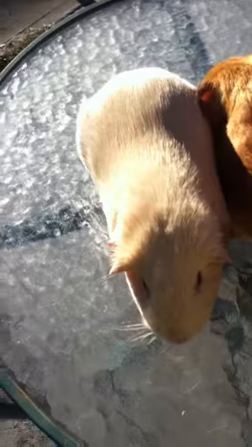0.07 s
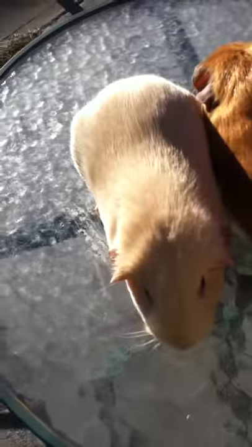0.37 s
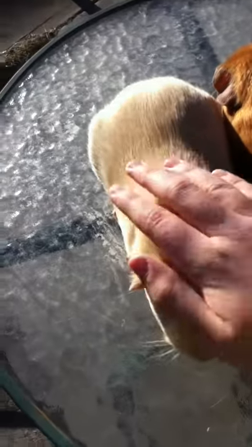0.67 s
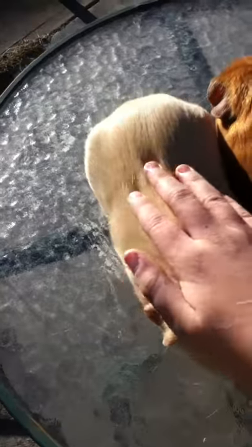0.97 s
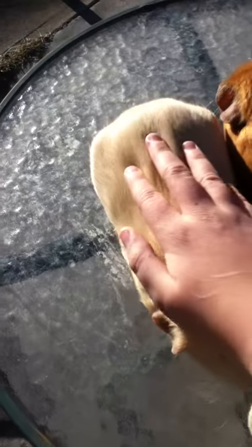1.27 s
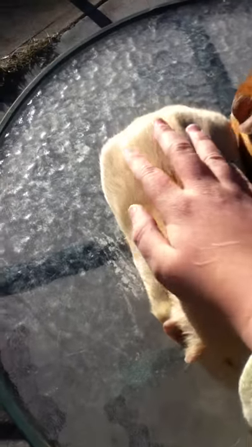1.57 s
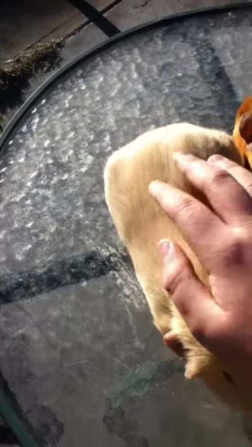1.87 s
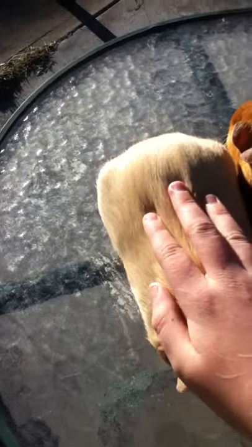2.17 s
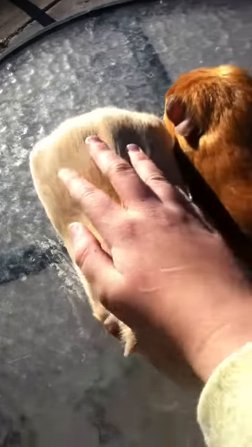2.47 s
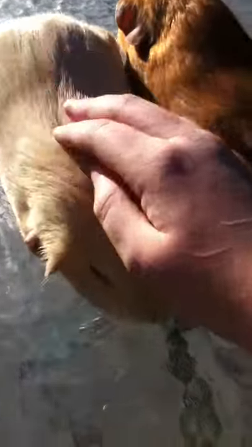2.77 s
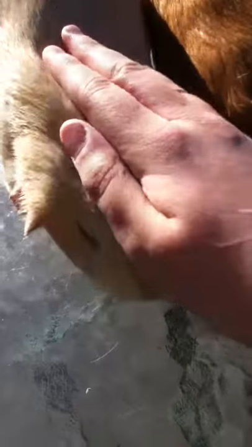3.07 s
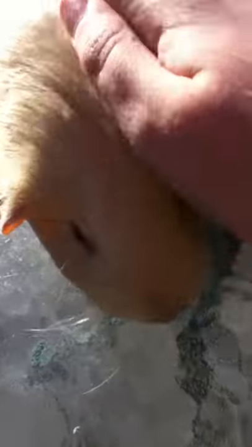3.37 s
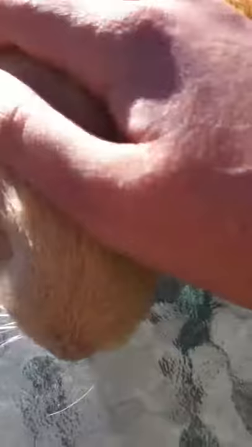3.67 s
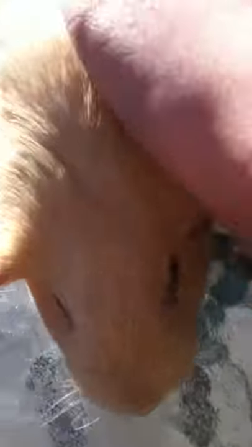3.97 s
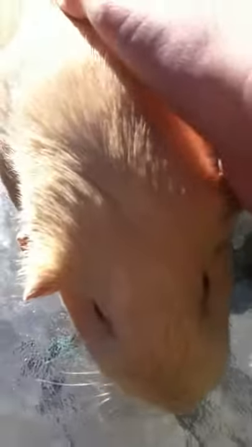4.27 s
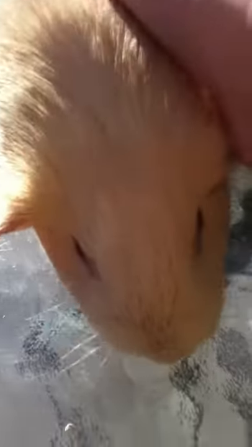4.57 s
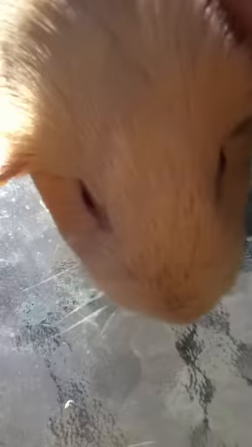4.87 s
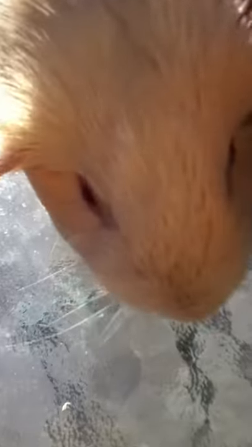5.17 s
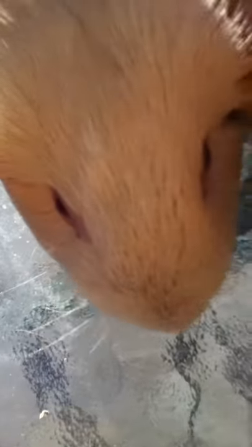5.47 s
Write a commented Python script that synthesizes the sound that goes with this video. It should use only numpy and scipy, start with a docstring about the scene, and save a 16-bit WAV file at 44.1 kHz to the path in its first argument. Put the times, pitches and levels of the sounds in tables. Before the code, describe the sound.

A faint outdoor hiss and distant low rumble run throughout. In the first half second come a few dry ticks, a light fur rustle and a brief falling squeak like a finger on glass. Sparrows chirp further off, slightly echoing, on and off until about 4.7 seconds. A guinea pig, close and almost dry, gives a tiny squeak at 1.1 seconds, then short wavering whimpers and rising squeaks from 1.5 to 3.2 seconds. From 3.3 to 3.9 seconds its calls turn brighter and a little raspy. Soft bumps fall at 3.5 and 4 seconds, the second with a brief, thin, very high whistle, over very faint fur rustle. Sharply rising squeaks and thin whines follow from 4.1 seconds, with the loudest squeaks at about 4.9 and 5.3 seconds. A low hum swells slightly late on, and a soft bump with a tick comes at 5.5 seconds.

```python
"""Guinea pig on a glass garden table

A brief falling squeak like a finger on glass, then the stroked animal's short, nearly pure, mostly
rising calls: vocal-fold harmonics shaped by the throat, louder and brighter as it gets excited and
the microphone nears. Sparrows chirp further off among house walls. Fur rustles; a few ticks, soft
bumps and a brief high whistle sound over a distant outdoor hum."""
import sys
import numpy as np
from scipy import signal
from scipy.fft import rfft, irfft
from scipy.io import wavfile
from scipy.ndimage import uniform_filter1d

SR = 44100
rng = np.random.default_rng(int(sys.argv[2]) if len(sys.argv) > 2 else 0)


def generate_wav(signal):
    """Clip the signal to [-1, 1] and save it as 16-bit WAV at the path in sys.argv[1]."""
    frames = np.transpose(np.atleast_2d(signal))
    scaled = np.clip(frames, -1, 1) * 32767
    pcm = np.round(scaled).astype(np.int16)
    wavfile.write(sys.argv[1], SR, pcm)


N = 248283
TIME = np.arange(N) / SR
TOP_HZ = 17250


def undb(db):
    """Decibels to gain."""
    return 10 ** (np.asarray(db) / 20)


def unit(x):
    """Scale to rms 1."""
    return x / np.sqrt(np.mean(x ** 2))


def curve(rows, t):
    """Linear interpolation of (time, value) rows."""
    return np.interp(t, *np.transpose(rows))


def spectrum_db(points, hz):
    """Interpolation of (frequency, level) rows over log frequency."""
    f, db = np.transpose(points)
    return np.interp(np.log(np.maximum(hz, 1)), np.log(f), db)


def walk(rate_hz, size):
    """Smooth random wander, spread near 1."""
    k = max(int(SR / rate_hz), 1)
    held = np.repeat(rng.standard_normal(size // k + 1), k)
    return np.sqrt(2) * uniform_filter1d(uniform_filter1d(held, k), k)[:size]


def swells(rows):
    """Sum of smooth rises and falls, one per (start, length, level) row."""
    return sum(undb(db) * np.sin(np.pi * np.clip((TIME - start_s) / length_s, 0, 1)) ** 2
               for start_s, length_s, db in rows)


def resonate(x, hz, width_hz):
    """One resonance, gain 1 at centre."""
    return signal.lfilter(*signal.iirpeak(hz, hz / width_hz, fs=SR), x)


def add(out, start_s, x):
    """Mix x into out at start_s."""
    i = int(start_s * SR)
    out[i:i + len(x)] += x[:max(N - i, 0)]


def echoes(x, t60_s, count, delay_s=.012):
    """Scattered, decaying reflections; unit-energy response."""
    when, polarity = rng.random((count, 2)).T
    taps = ((delay_s + when * t60_s) * SR).astype(int)
    response = np.zeros(SR * 2)
    np.add.at(response, taps, np.sign(polarity - .5) * undb(-60 * when))
    return signal.fftconvolve(x, response / np.linalg.norm(response))[:N]


# Outdoor noise spectrum: f/Hz, relative level/dB
AIR_SPECTRUM = [(15, -55), (25, -17), (103, -1.5), (140, -2), (210, -5.5), (416, -9.5), (490, -10),
                (717, -7), (1050, -7.5), (1420, -16.5), (1540, -16.5), (1920, -21.5), (3310, -24.5),
                (8360, -26.5), (17000, -31)]
# Rumble swell: t/s, gain/dB
RUMBLE_SWELL = [(0, -3), (1, -1.5), (2.2, -1), (3, 1.5), (3.7, 1), (4.3, 1), (5, 1.5), (5.6, 1)]


def outdoor_air(level_db=-49, flicker_db=1.62, split_hz=1800):
    """Smooth hiss over a far rumble that flickers by octave; the low octaves swell most."""
    hz = np.arange(N // 2 + 1) * SR / N
    shaped = rfft(rng.standard_normal(N)) * undb(spectrum_db(AIR_SPECTRUM, hz))
    air = rfft(unit(irfft(shaped, N))) * undb(level_db)
    swell_db = curve(RUMBLE_SWELL, TIME)
    out = irfft(air * (hz >= split_hz), N)
    for octave in range(7):
        edge_hz = split_hz / 2 ** octave
        band = irfft(air * (hz < edge_hz) * (hz >= edge_hz / 2), N)
        depth = min((octave + 1) / 4, 1)
        out += band * undb(depth * swell_db + flicker_db * walk(12, N))
    return out


# Hum envelope: t/s, level/dB
HUM_LEVEL = [(0, -65), (3, -62.5), (4.5, -55.5), (5.1, -60), (5.6, -51)]


def distant_hum(hz=149.1, waver_hz=1.43, waver_db=2):
    """A low tone, wavering in pitch and level."""
    phase = 2 * np.pi * np.cumsum(hz + waver_hz * walk(17, N)) / SR
    return np.sin(phase) * undb(curve(HUM_LEVEL, TIME) + waver_db * walk(3.5, N))


# Whistle pulses: t/s, length/s, level/dB
WHISTLE_PULSES = [(3.933, 0.057, -52), (3.992, .04, -63)]


def whistle(hz=12064):
    """A thin, very high tone in two brief pulses."""
    return swells(WHISTLE_PULSES) * np.sin(2 * np.pi * hz * TIME)


# Hand strokes: t/s, length/s, level/dB
STROKES = [(.12, .27, -58), (0.355, 0.63, -71), (3.3, 1.27, -64.5)]


def fur(centre_hz=10500, width_hz=8000, spread_db=6):
    """Hairs slip under the fingers: fine, uneven crackle swelling with each stroke."""
    hairs = rng.standard_normal(N) * undb(spread_db * walk(900, N))
    return unit(resonate(hairs, centre_hz, width_hz)) * swells(STROKES)


# Dry ticks: t/s, level/dB, centre f/Hz
TICKS = [(0.176, -39, 12000), (.181, -48, 12000), (.230, -47, 13000), (0.247, -45, 10500),
         (.2703, -36.5, 7900), (.398, -53, 12000), (5.5, -49, 1800)]
# Soft bumps: t/s, level/dB, ring f/Hz, t60/s
BUMPS = [(3.5315, -33, 490, .03), (3.950, -39, 520, .03), (5.499, -31, 560, .01)]


def handling(tick_decay_s=.0009, tick_width_hz=8000):
    """The moving hand makes dry ticks and dull, quickly damped bumps."""
    out, t = np.zeros(N), np.arange(SR // 10) / SR
    for start_s, db, hz in TICKS:
        noise = rng.standard_normal(len(t))
        crack = resonate(resonate(noise, hz, tick_width_hz), hz, tick_width_hz)
        add(out, start_s, undb(db) * unit(crack) * np.exp(-t / tick_decay_s))
    for start_s, db, hz, t60_s in BUMPS:
        push = np.minimum(2 * hz * t, 1)  # soft contact builds over half a cycle
        add(out, start_s, undb(db - 60 * t / t60_s) * push * np.sin(2 * np.pi * hz * t))
    return out


# Sparrow notes, mostly high-low pairs: t/s, length/s, top f/Hz, arch depth/oct, level/dB
CHIRPS = [ (0.119, 0.046, 4800, 0.53, -45), (0.166, .05, 3680, .28, -49), (0.653, 0.053, 5400, 0.26, -59),
          (.722, 0.052, 4850, 0.11, -55.5), (1.106, 0.049, 5400, .6, -51), (1.146, 0.0277, 4400, .14, -44),
          (1.19, 0.054, 4080, .42, -46.5), (1.548, .032, 5940, 0.21, -50), (1.637, 0.033, 4730, .03, -49.5),
          (1.930, 0.051, 3700, .3, -49), (1.931, 0.035, 4470, 0.096, -50.5), (2.316, 0.057, 5560, .12, -51),
          (2.432, 0.042, 5070, 0.17, -55), (3.324, .034, 4900, 0.48, -51), (3.383, .036, 4000, .4, -52.5),
          (3.668, .043, 4490, .42, -48.5), (3.747, 0.037, 4110, 0.39, -49.5),
          (4.522, .027, 5650, 0.22, -51), (4.603, 0.042, 4180, .2, -53.5)]


def sparrows(waver=.014, buzz_per_oct=.0494, thin_db_per_oct=4, lean_db_per_oct=4, flicker_db=3):
    """Arched, wavering whistles, smeared and dulled by the house walls."""
    out = np.zeros(N)
    for start_s, length_s, top_hz, depth_oct, db in CHIRPS:
        u = np.linspace(-1, 1, int(length_s * SR))
        drop_oct = depth_oct * u ** 2
        hz = top_hz * 2 ** -drop_oct * (1 + (waver + buzz_per_oct * depth_oct) * walk(1000, len(u)))
        # thin at the top, loudest on the way down
        shape_db = thin_db_per_oct * (drop_oct - depth_oct / 2) + lean_db_per_oct * depth_oct * u
        gain = undb(db + shape_db + flicker_db * walk(200, len(u))) * (1 - u ** 2) ** (1 / 3)
        add(out, start_s, gain * np.sin(2 * np.pi * np.cumsum(hz) / SR))
    dulled = resonate(out, hz=3800, width_hz=3000)
    return out + undb(-2) * echoes(dulled, t60_s=.48, count=400)


def call_envelope(hz, easy_hz=1000, knee=4.3, strain_db_per_oct=21.5, sag_db_per_s=16, release_s=.0057):
    """Above its easy range the voice starts slower and weakens; each call sags as it goes."""
    t = np.arange(len(hz)) / SR
    strain_oct = np.log2(1 + (hz / easy_hz) ** knee) / knee
    attack_s = np.clip(.0025 * (hz[0] / easy_hz) ** 4, .0025, .014)
    gate = np.minimum(t / attack_s, 1) * np.minimum(t[::-1] / release_s, 1)
    return gate * undb(-strain_db_per_oct * (strain_oct - strain_oct.min()) - sag_db_per_s * t)


def breath(phase):
    """Air leaks through the folds once a cycle and rings two resonances."""
    puffs = rng.standard_normal(len(phase)) * (1 + np.cos(phase))
    main = resonate(resonate(puffs, 2900, 1500), 2850, 1500)
    return unit(main + .085 * resonate(puffs, 9800, 3000))


# Throat and mouth response: f/Hz, gain/dB
THROAT = [(600, 12), (1050, -0.5), (1600, -10), (2000, -6.5), (2450, -7), (3000, -2.5), (3350, -4.5),
          (4200, -16.5), (5500, -14.5), (7400, -11), (9200, -13), (16000, -22)]
# Resonance shift, rising as the mouth opens: t/s, frequency ratio
MOUTH = [(1.5, 0.86), (2.6, 0.93), (3.3, 1.005), (3.9, 1), (4.15, 1.086), (4.7, 1.05), (5.35, 0.93)]


def call(start_s, pitch_hz, overtones_db, roughness, jitter=.0095, tremor_rad=.11, flutter_db=2.5,
         shimmer_db=.35, breath_db=-39, bloom_s=.013, onset_dip_db=1, onset_dull_db_per_oct=4):
    """Vocal folds give a harmonic stack whose overtones sweep through the throat resonances."""
    size = len(pitch_hz)
    mouth = curve(MOUTH, start_s)
    hz = pitch_hz * (1 + jitter * walk(700, size))
    phase = 2 * np.pi * np.cumsum(hz) / SR
    onset = np.exp(-np.arange(size) / SR / bloom_s)
    # high notes and onsets are purer
    slope_db_per_oct = 8.5 * (hz / 1000) ** .13 + onset_dull_db_per_oct * onset
    tremor = tremor_rad * walk(900, size)  # folds close early or late, blurring the top overtones
    voice = np.sin(phase)
    for k in range(2, 11):
        throat_db = spectrum_db(THROAT, k * hz / mouth) - spectrum_db(THROAT, hz / mouth)
        db = overtones_db + throat_db - slope_db_per_oct * np.log2(k) + flutter_db * walk(145, size)
        voice += undb(db) * np.sin(k * (phase + tremor)) * (k * hz < TOP_HZ)
    # uneven cycles; the voice clears above its median pitch
    hoarse = roughness * np.minimum(np.median(pitch_hz) / pitch_hz, 1) ** 3.7
    voice *= 1 + hoarse * walk(1100, size)
    voice += (undb(breath_db + overtones_db) + .17 * hoarse) * breath(phase)
    return voice * call_envelope(pitch_hz) * undb(shimmer_db * walk(300, size) - onset_dip_db * onset)


# Whimper pitch curves: t/s, f/Hz
THIN_WHINE = [(1.567, 1380), (1.583, 1310), (1.593, 1350), (1.603, 1280), (1.617, 1370), (1.626, 1270),
              (1.664, 1390), (1.686, 1270), (1.705, 1410)]
SHORT_WHINE = [(1.845, 840), (1.858, 1020), (1.879, 970), (1.892, 1100), (1.899, 1110), (1.912, 980),
               (1.931, 1170)]
CLIMBING_WHINE = [(1.963, 920), (2.017, 1140), (2.034, 1000), (2.047, 980), (2.133, 1220), (2.143, 1360),
                  (2.168, 1310), (2.193, 1570), (2.2, 1450), (2.238, 1500), (2.25, 1620)]
ARCHED_WHINE = [(2.483, 900), (2.492, 1010), (2.51, 940), (2.524, 980), (2.537, 1230), (2.546, 1200),
                (2.576, 1660), (2.6, 1120), (2.611, 1050)]
LOW_WHINE = [(2.717, 800), (2.724, 820), (2.73, 910), (2.739, 910), (2.75, 780), (2.779, 830), (2.79, 720)]
LONG_PROTEST = [(3.282, 750), (3.286, 750), (3.298, 940), (3.33, 950), (3.337, 870), (3.352, 1110),
                (3.366, 1060), (3.376, 1280), (3.395, 820), (3.408, 950), (3.421, 850)]
SHORT_PROTEST = [(3.571, 720), (3.574, 720), (3.591, 920), (3.617, 860), (3.623, 940), (3.641, 980)]
RISING_PROTEST = [(3.798, 640), (3.808, 630), (3.824, 970), (3.83, 1020), (3.844, 870), (3.861, 1330),
                  (3.901, 2070)]
HIGH_WHINE = [(4.446, 1675), (4.472, 1520), (4.502, 1610), (4.514, 1806), (4.532, 1803), (4.542, 1615),
              (4.564, 1629), (4.578, 1430)]
HIGH_PEEP = [(5.048, 2680), (5.084, 2560), (5.096, 2420), (5.107, 2370), (5.12, 2480), (5.135, 2380)]
# Whimpers: pitch curve, relative level/dB, overtone gain/dB, roughness/0-1
WHIMPERS = [ (THIN_WHINE, -40.5, -18.5, .025), (SHORT_WHINE, -33.5, -12, 0.021),
            (CLIMBING_WHINE, -33, -14, 0.017), (ARCHED_WHINE, -33, -10, 0.032),
            (LOW_WHINE, -31, -9.5, 0.023), (LONG_PROTEST, -32, 1.5, .06),
            (SHORT_PROTEST, -30.5, 2.5, 0.024), (RISING_PROTEST, -29, 2.6, .1),
            (HIGH_WHINE, -41.5, -4.5, 0.12), (HIGH_PEEP, -37.5, -7, .02)]


def whimpers():
    """Wavering calls whose pitch glides from turn to turn."""
    out = np.zeros(N)
    for points, db, overtones_db, roughness in WHIMPERS:
        start_s, end_s = points[0][0], points[-1][0]
        hz = curve(points, np.arange(start_s, end_s, 1 / SR))
        hz = uniform_filter1d(hz, size=200, mode="nearest")
        add(out, start_s, undb(db) * call(start_s, hz, overtones_db, roughness))
    return out


# Squeaks: t/s, length/s, start f/Hz, held f/Hz, end f/Hz, bend exponent,
# relative level/dB, overtone gain/dB, roughness/0-1
SQUEAKS = [ (.279, .035, 1392, 1200, 640, 1.7, -46, -14, 0.3),
           (1.092, .021, 1150, 1500, 1620, 2.4, -41, -12, 0.06),
           (1.493, 0.051, 940, 1076, 1610, 2.3, -34.5, -16, 0),
           (2.829, 0.026, 713, 860, 696, 1.45, -33.5, -2.5, 0),
           (3.008, 0.084, 618, 880, 1580, 4.6, -31.5, -8, 0),
           (3.107, 0.063, 1812, 778, 810, 2.1, -33.5, -10, 0.09),
           (4.135, .091, 986, 1110, 2180, 5.9, -30, -2, 0.02),
           (4.335, 0.081, 1067, 1046, 2350, 3.96, -29.5, -3.5, 0.06),
           (4.569, 0.044, 1664, 1220, 1570, 2.9, -36.5, -6, 0.1),
           (4.62, 0.036, 1235, 1370, 1610, 4.9, -37.5, -9.5, 0.1),
           (4.668, 0.078, 1650, 1530, 1780, 1.6, -41.5, -11.5, 0.12),
           (4.853, .070, 954, 1057, 2050, 3.55, -25, -5, .02),
           (5.3148, 0.08, 1032, 1070, 2780, 2.12, -22, -7.5, 0.01),
           (5.519, 0.033, 2830, 2720, 2590, 1.5, -54.5, -12, .02)]


def squeaks(scoop_s=.012, fade_db=5):
    """Guinea pig calls, after one brief falling squeak like a finger rubbing glass."""
    out = np.zeros(N)
    for start_s, length_s, first_hz, held_hz, last_hz, bend, db, overtones_db, roughness in SQUEAKS:
        t = np.arange(0, length_s, 1 / SR)
        scoop = (first_hz / held_hz) ** np.exp(-t / scoop_s)
        sweep = (last_hz / held_hz) ** ((t / length_s) ** bend)  # more bend: later, sharper
        gain = undb(db - fade_db * np.linspace(0, 1, len(t)) ** 5.8)
        add(out, start_s, gain * call(start_s, held_hz * scoop * sweep, overtones_db, roughness))
    return out


def guinea_pig(direct_db=4, echo_db=-40):
    """The calls and the opening glassy squeak: close, almost dry, with a faint garden echo."""
    close = squeaks() + whimpers()
    return undb(direct_db) * close + undb(echo_db) * echoes(close, t60_s=.34, count=500)


def scene():
    """Mono mix of all sources."""
    return (guinea_pig() + sparrows() + handling() + fur() + whistle() + outdoor_air() + distant_hum())[None]


def record(dry, silent_s=.0355):
    """A moment of silence at the start; steep low-pass at TOP_HZ."""
    lowpass = signal.ellip(10, .2, 70, TOP_HZ, fs=SR, output="sos")
    return signal.sosfilt(lowpass, dry * (TIME > silent_s))


dry = scene()
out = record(dry)
generate_wav(out)
```